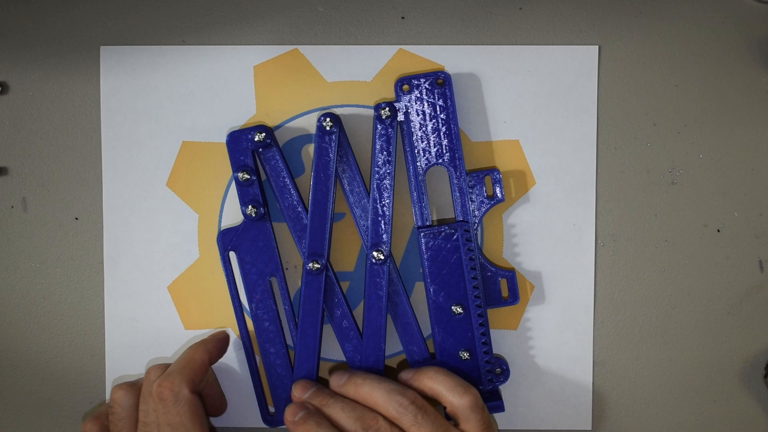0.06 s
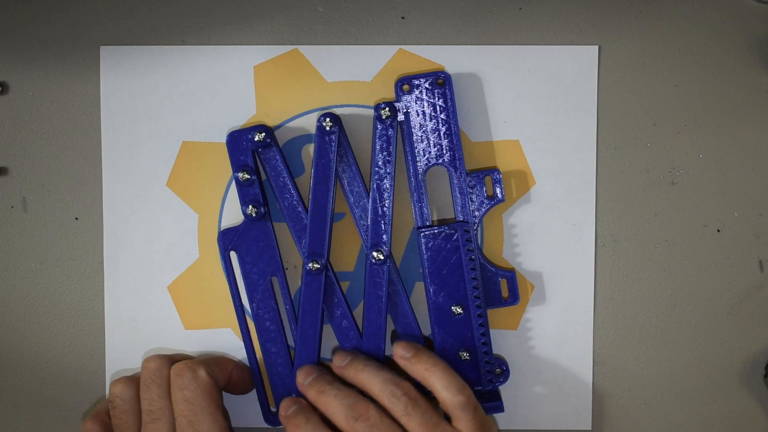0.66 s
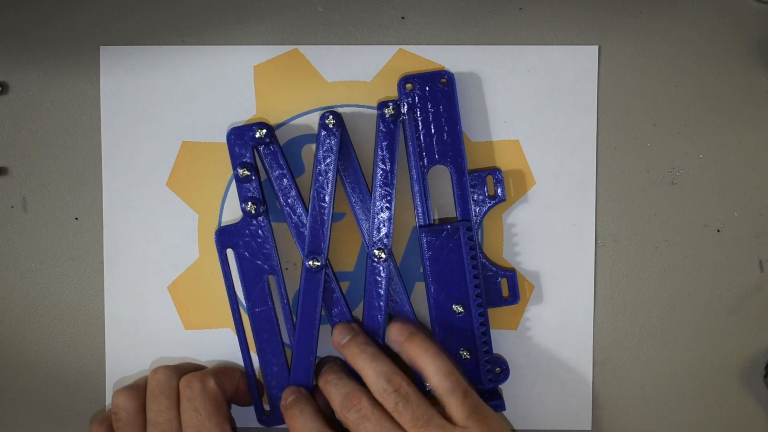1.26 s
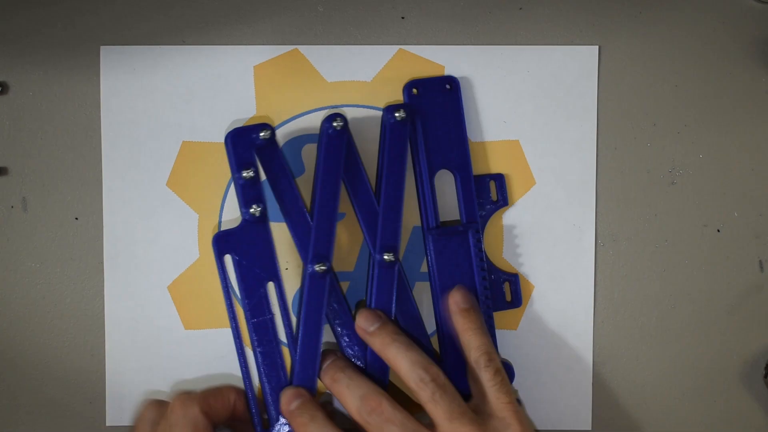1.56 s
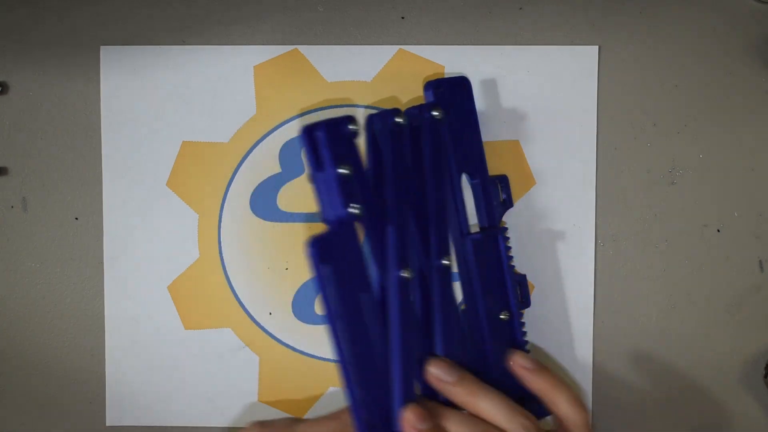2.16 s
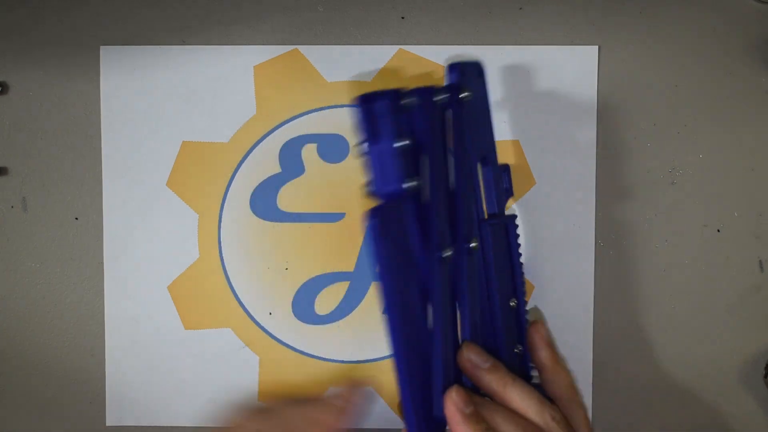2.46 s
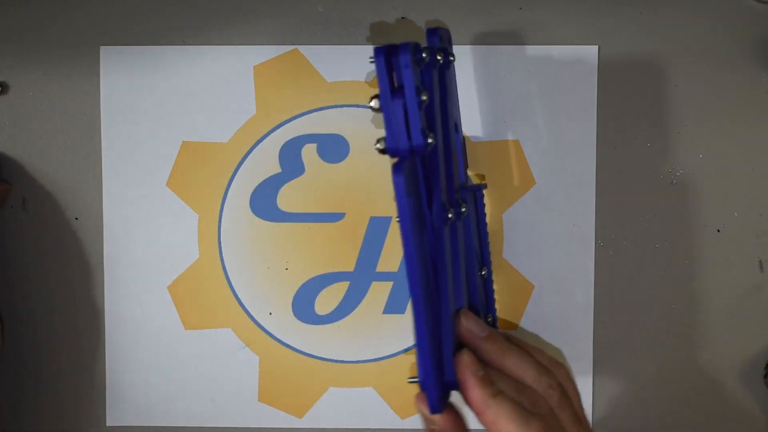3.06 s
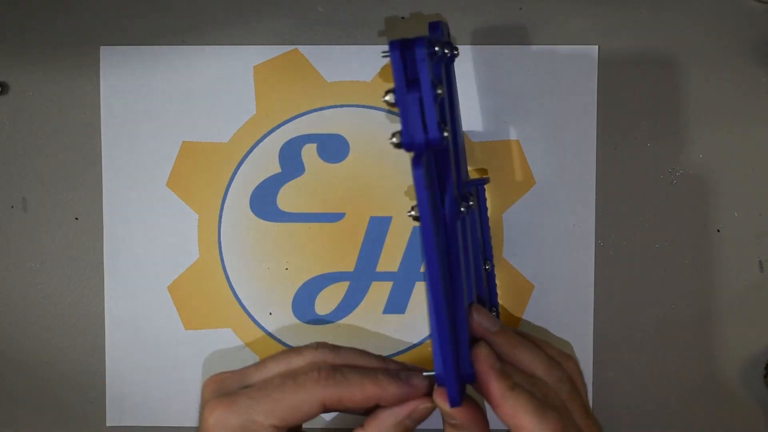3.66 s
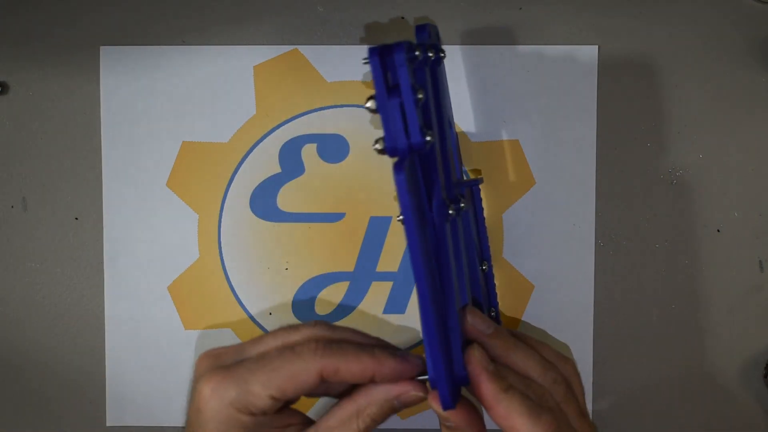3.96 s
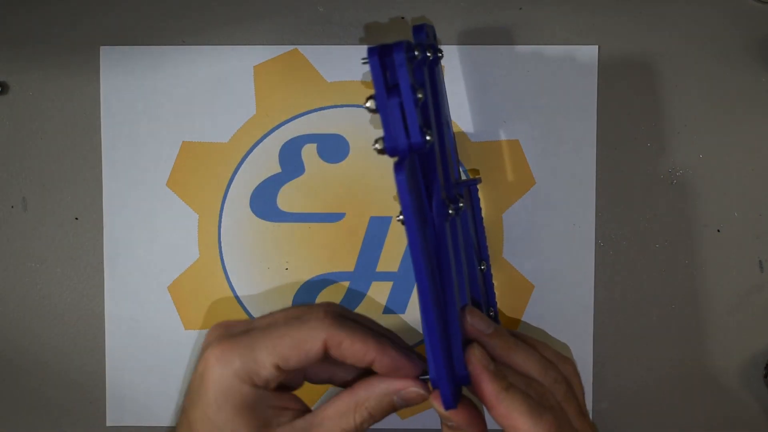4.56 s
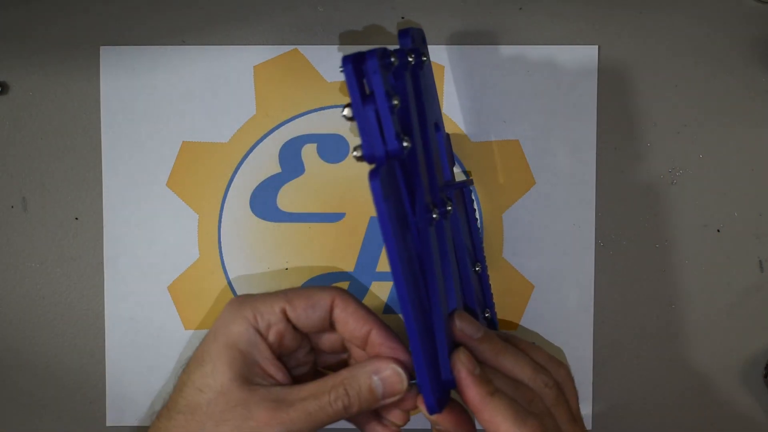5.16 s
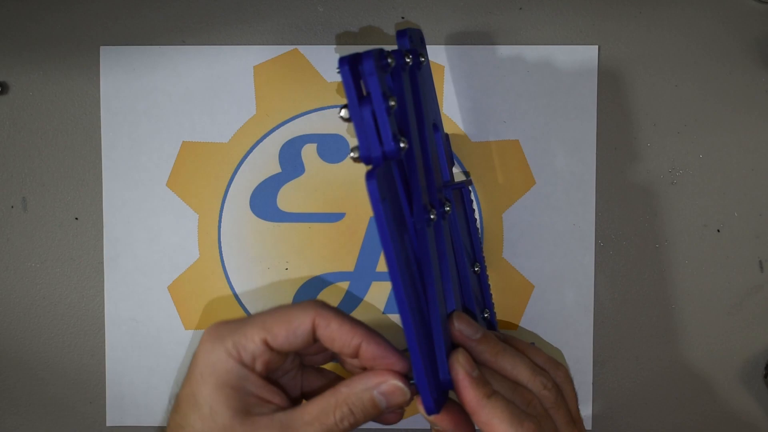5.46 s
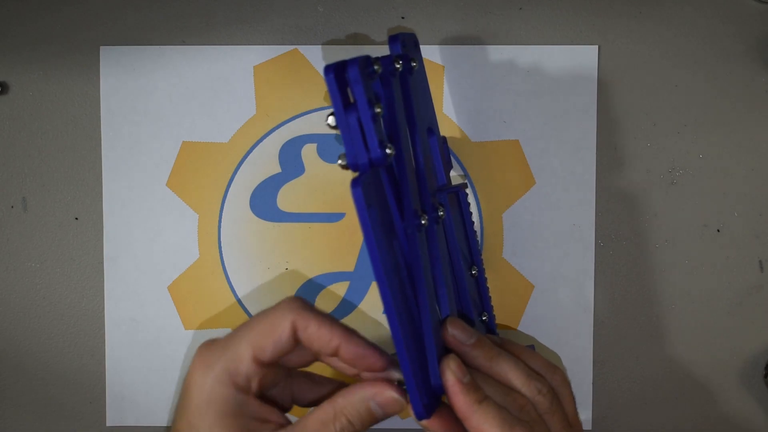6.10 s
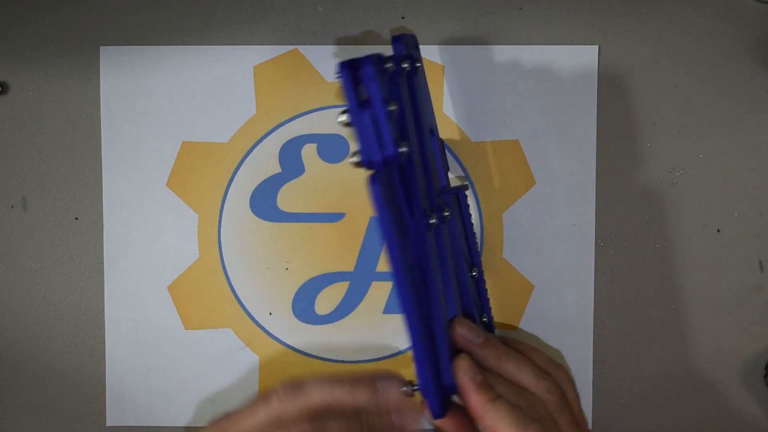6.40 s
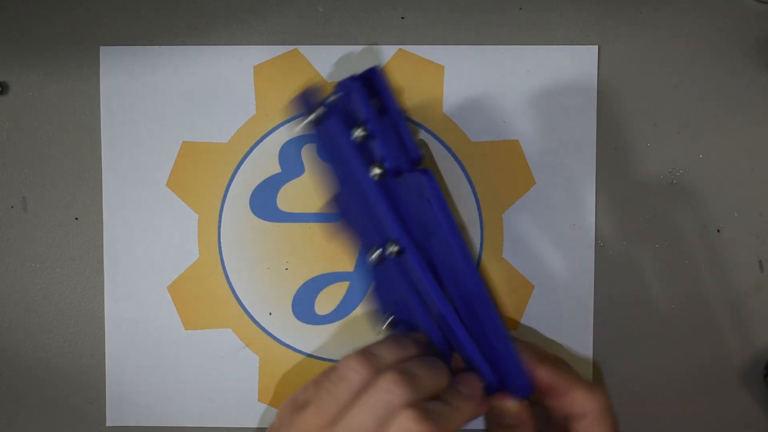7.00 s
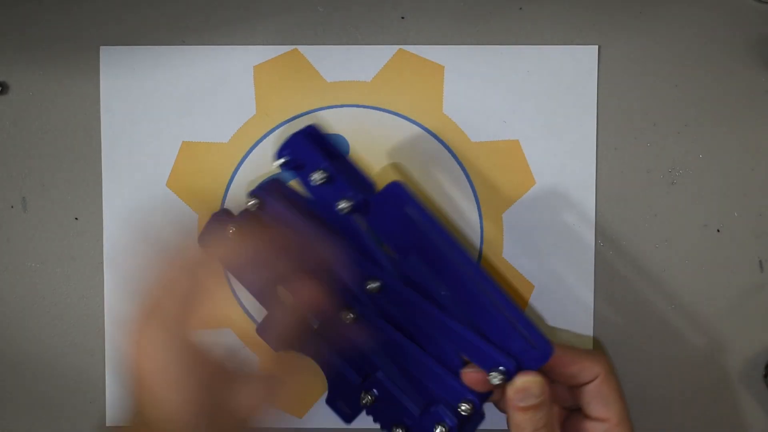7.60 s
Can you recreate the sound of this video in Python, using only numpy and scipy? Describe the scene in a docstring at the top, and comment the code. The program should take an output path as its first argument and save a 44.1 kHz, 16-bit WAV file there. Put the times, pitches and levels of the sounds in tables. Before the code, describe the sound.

A frame of hard plastic links is handled on a desk, close and central in a small quiet room. It starts with light clicks, soft knocks and a tiny creak from the catch. At about 0.9 seconds a slider rasps briefly and hits its stop with a sharp, loud clack. Around 1.6 seconds comes a cluster of strong knocks that ring the desk top. Lighter knocks, clicks and short scrapes continue until about 3 seconds. From there to 6.5 seconds it is much quieter, with only scattered ticks and soft finger nudges. Around 7 seconds the frame is dragged over the desk, rubbing with a brief squeal, and a few knocks follow between 7.4 and 7.8 seconds. Soft room air and the faint high whine of a fan lie behind it all.

```python
"""Folding frame on a desk

Close microphone, small quiet room: a frame of hard plastic links is handled on a desk, dead centre.
Its catch creaks and lets go, a slider rasps to its stop; the frame is folded, stood up, fiddled with
and dragged round, rubbing and squealing. Links click as their edges snap past each other, and knocks
ring the desk top. Behind it all, in stereo, lie room air and the faint whine of a fan."""
import sys
import numpy as np
from scipy import signal
from scipy.fft import rfft, irfft, next_fast_len
from scipy.io import wavfile
from scipy.ndimage import uniform_filter1d, map_coordinates

SR = 44100
rng = np.random.default_rng(int(sys.argv[2]) if len(sys.argv) > 2 else 0)


def log_audio(samples):
    """Write samples as a 16-bit WAV file to the path given in sys.argv[1]."""
    # one column per channel
    frames = np.atleast_2d(samples).T
    # limit to full scale, then quantise
    limited = np.clip(frames, -1, 1)
    pcm = np.round(limited * 32767).astype(np.int16)
    wavfile.write(sys.argv[1], SR, pcm)


N = 345744
TIME = np.arange(N) / SR
AGE = TIME[:SR // 2]  # time since a blow [s]

# Event levels are relative within each table.
# the frame knocks on the desk: (time [s], level [dB], pitch [Hz], clack re knock [dB])
KNOCKS = [(0.011, -54.5, 317, -0.5), (0.115, -47.5, 125, -15), (0.403, -47.5, 330, -8.5),
          (0.758, -47.5, 347, -17), (0.802, -47.5, 302, 2.5), (1.158, -44.5, 603, -10),
          (1.394, -47, 365, -11), (1.534, -46.5, 257, -12), (1.564, -37.5, 295, -16),
          (1.58, -20.5, 386, -14), (1.582, -29, 750, -24), (1.584, -33, 1120, -33), (1.63, -31.5, 376, -15),
          (1.637, -31, 412, -16), (1.741, -29.5, 205, -19.5), (2.068, -41, 194, -9),
          (2.261, -45.5, 177, -13), (2.283, -48.5, 367, -4), (2.529, -42, 171, -4.5),
          (2.595, -46.5, 165, -14), (2.851, -38.5, 243, -4.5), (3.029, -47, 155, -24),
          (3.054, -53, 760, 8.5), (3.549, -52, 420, -2.5), (3.6, -49, 204, -13), (4.019, -55, 180, -1.5),
          (5.897, -54.5, 163, -5), (6.702, -43.5, 305, -10), (7.42, -38, 238, -6), (7.44, -39.5, 348, -13),
          (7.676, -42.5, 138, -7), (7.734, -43.5, 268, 2), (7.762, -44, 131, -25)]
# links and screws click: (time [s], level [dB], body [dB], pitch [Hz])
CLICKS = [(0.012, -48, 10, 1870), (0.077, -49.5, 1, 2900), (0.103, -42.5, -4, 2980), (0.118, -45, -7, 3440),
          (0.183, -48, 4, 3550), (0.209, -53, 4, 5350), (0.768, -49.5, 0, 4900), (0.797, -41.5, 9, 1650),
          (0.8, -36, -1, 1640), (0.817, -46, 4, 3400), (0.8512, -30, -10, 4960), (0.856, -26, -14, 4330),
          (0.871, -30, -9, 3500), (1.14, -50, 7, 3350), (1.163, -48, 0, 3630), (1.475, -45, -4, 2860),
          (1.61, -46.5, -4, 4200), (1.638, -46.5, -5, 4500), (1.694, -45, 5.5, 2000),
          (1.748, -46.5, 4, 5300), (1.843, -52.5, 2, 1780), (2.156, -53.5, -5, 7800),
          (2.285, -45.5, 8, 2270), (2.538, -43, 13, 1950), (2.546, -42, 1, 4940), (3.549, -46, -7, 5000),
          (3.559, -51, -9, 4940), (4.0185, -41.5, -23, 4800), (5.899, -46.5, -17, 3600),
          (6.451, -51.5, -7, 4700), (6.489, -51, -16, 4800), (7.564, -50, -1, 5070)]
# the slider hits its stop: (time [s], level [dB])
STOP_HITS = [(0.892, -17), (0.897, -26)]
# the thumb presses the catch: (start [s], length [s], level [dB])
PRESSES = [(0.1, 0.023, -55), (0.191, 0.051, -61.5), (0.257, 0.032, -45.5)]
# the frame is pushed over the desk: (start [s], length [s], level [dB], tilt [dB/octave])
STROKES = [(0.451, 0.042, -69.5, -0.5), (1.556, 0.11, -69.5, 2), (2.016, 0.17, -71.5, -1.5),
           (2.456, 0.09, -75, 4), (2.713, 0.058, -62.5, -0.5), (2.804, 0.046, -55.5, -0.4),
           (2.878, 0.13, -65, -2.5), (3.146, 0.035, -63.5, -2.3), (3.221, 0.03, -73, -2.5),
           (6.655, 0.087, -71.5, -3.1), (6.836, 0.016, -63, 1), (6.866, 0.044, -46, -1),
           (6.964, 0.11, -43.5, 0.1), (7.108, 0.041, -43, 0), (7.188, 0.014, -49, 0.1),
           (7.225, 0.026, -67.5, -4), (7.672, 0.13, -68, -2)]
# friction squeals: (start [s], length [s], first pitch [Hz], last pitch [Hz], level [dB])
SQUEALS = [(2.13, 0.14, 8450, 8400, -82), (2.47, 0.05, 7500, 7400, -73.5), (6.886, 0.0078, 360, 362, -33),
           (6.962, 0.079, 363, 319.6, -40.5), (6.999, 0.011, 333.4, 324, -37),
           (6.968, 0.056, 1930, 1940, -41), (6.998, 0.16, 1105, 1472, -48), (7.052, 0.12, 1915, 1920, -49)]
# fingers nudge the frame: (time [s], level [dB])
NUDGES = [(0.631, -61.5), (1.34, -65.5), (3.70, -70.5), (3.91, -66.5), (4.30, -67), (4.648, -62.5),
          (5.654, -61), (6.311, -58), (6.397, -55.5), (6.478, -61.5)]
# a finger brushes along a link: (start [s], length [s], level [dB])
BRUSHES = [(1.394, 0.06, -72.5), (3.308, 0.022, -67), (6.704, 0.0087, -66), (7.754, 0.095, -71.5)]

# modes of the frame lying on the desk, and of the stop: (frequency [Hz], level [dB], t60 [s])
DESK_MODES = [(87, -15.5, 0.3), (164.4, -7.5, 0.15), (204.7, -9.5, 0.14), (361, -6, 0.12), (406, -14, 0.16),
              (568, -13.5, 0.099), (711, -11.5, 0.035)]
STOP_MODES = [(50.2, -28, 1), (100, -30, 0.79), (390, -14, 0.09), (577.6, -10.5, 0.19), (740, -15, 0.096),
              (1185, -6, 0.084), (1348, -10.5, 0.12), (1563, -9, 0.082), (1634, -12, 0.057),
              (2400, -17, 0.036), (2560, -11, 0.045)]
# modes of a plastic link: (frequency [Hz], level [dB])
LINK_MODES = [(1020, -17), (1150, -0.5), (1330, -1), (1640, -2), (1925, 1.5), (2250, -2.5), (2450, -20.5)]
# resonances of the dragged frame, the slider and the catch: (frequency [Hz], width [Hz], level [dB])
FRAME_PEAKS = [(164.5, 63, -0.5), (366, 93, -2), (573, 66, -6.5), (748, 43, -7.5), (1232, 58, -11.5),
               (1910, 360, -13), (2220, 180, -15), (2460, 85, -13.5), (3370, 47, -15), (4960, 150, -22),
               (8200, 380, -21.5), (8900, 270, -21.5), (11700, 270, -27.5)]
SLIDER_PEAKS = [(366, 99, -1.5), (1660, 160, -4.5), (2720, 370, -5.5), (3600, 420, -1.5), (4810, 420, -6),
                (6120, 230, -10.5), (8750, 1200, -16.5), (12200, 640, -17), (13500, 610, -22)]
CATCH_PEAKS = [(335, 100, 8.5), (1970, 220, -3), (2900, 290, -2.5), (3590, 520, -0.5), (4400, 91, -2),
               (5700, 490, -9.5), (7750, 590, -19)]
# spectra of friction at the frame, slider, catch and skin: (frequency [Hz], level [dB])
RUB_COLOUR = [(40, -40), (75, -51), (110, -2.5), (250, -8.5), (450, -15), (900, -15.5), (1700, -18.5),
              (2600, -20), (4200, -23.5), (7400, -30.5), (10200, -34.5), (15500, -39)]
RASP_COLOUR = [(60, -35), (130, -6), (400, -9.5), (1100, -7), (2400, -12), (4500, -17), (7000, -13.5),
               (10500, -18), (13500, -27), (15500, -29)]
CREAK_COLOUR = [(60, -27), (110, 0), (300, -3), (700, -6.5), (1800, -2.5), (4000, -28), (8500, -27),
                (10000, -30), (15500, -38)]
SKIN_COLOUR = [(300, -20), (1500, 2), (3000, -1), (5000, -3), (8500, -1), (11000, -7), (15500, -9)]
# spectra of broad blows, small contacts and the booming desk top: (frequency [Hz], level [dB])
CLACK_COLOUR = [(100, -64), (300, -4), (800, 1.5), (1300, -7.5), (2300, -3.5), (3200, -15.5), (6000, -26.5),
                (15000, -37)]
TICK_COLOUR = [(300, -4), (1000, 2.5), (2000, 4.5), (2900, 6), (3800, 1.5), (4900, -1.5), (6400, -4.5),
               (8400, -0.5), (10500, -11), (13000, 1.5), (15500, -9)]
BOOM_COLOUR = [(20, -17), (34, -16), (49, -8.5), (66, -22), (98, -10.5), (135, -9.5), (220, -55),
               (600, -95)]

# decay of the small room: (frequency [Hz], t60 [s])
ROOM_DECAY = [(100, 0.44), (400, 0.39), (2000, 0.39), (7000, 0.34), (14000, 0.26)]
# the fan's noise bands: (frequency [Hz], width [Hz], level [dB])
FAN_BANDS = [(191.8, 13, -80), (954.6, 19, -84), (1006, 430, -82.5)]
# spectrum of room air and microphone hiss: (frequency [Hz], level [dB])
AIR_COLOUR = [(20, -7), (32, -8), (50, -1.5), (65, -8.5), (100, -8), (190, -5), (250, -12), (360, -8.5),
              (550, -12.5), (800, -12.5), (1050, -14), (1400, -16.5), (2600, -23.5), (15500, -27.5)]
# how alike that air is left and right: (frequency [Hz], correlation [0-1])
AIR_LIKENESS = [(60, 0.97), (180, 0.99), (550, 0.97), (1650, 0.98), (4970, 0.47), (15000, 0.4)]


def knocks():
    """The frame lands with a thump that rings desk and links, then rocks back, softer and lower."""
    out = np.zeros(N)
    rebounds = [(s + 0.014, db - 8, hz * 0.634, clack_db) for s, db, hz, clack_db in KNOCKS]
    link_modes = [(hz, db, 0.035) for hz, db in LINK_MODES]  # hard plastic damps them all quickly
    for s, db, hz, clack_db in list(KNOCKS) + rebounds:
        swing = np.sin(2 * np.pi * hz * AGE) * amp(-60 * AGE / 0.031) * (1 - np.exp(-AGE / 0.0021))
        thump = np.gradient(swing) * SR / (2 * np.pi * hz)  # the air follows the surface's speed
        hardness_db = 0.19 * (db + 35.5)  # per octave: a hard blow is brief and reaches higher modes
        modes = [(f, level + hardness_db * np.log2(f / 400), t60) for f, level, t60 in DESK_MODES]
        desk = amp(-7.5) * ring(modes, scatter_db=2.5)
        links = amp(-11.5) * ring(link_modes, scatter_db=2.5)
        clack = amp(-3.5) * crack(colour(CLACK_COLOUR), 0.0023, t60=0.029, rattle=(-15, 0.26))
        add(out, s, amp(db) * (amp(5) * thump + desk + amp(clack_db) * (links + clack)))
    return out


def clicks():
    """Hard edges scuff, then snap past each other; small contacts are brighter and quicker."""
    out = np.zeros(N)
    ping_db, ping_width = 8, 0.13  # the struck part's resonance; width as a share of its pitch
    for s, db, body_db, hz in CLICKS:
        edge_db = -10 - 0.66 * body_db  # the less body, the keener the edge
        screw_db = 0.67 * max(-body_db - 6, 0)  # with little body, a screw's own ping stands out
        tilt = [(2300, body_db), (4600, 0), (6500, 0.022), (8400, screw_db), (11000, edge_db)]
        ping = lambda f: ping_db * band(f, hz, ping_width * hz)
        response = lambda f: amp(along(TICK_COLOUR, f) + along(tilt, f) + ping(f))
        tick = crack(response, 0.00011 * amp(-edge_db), t60=0.015, rattle=(-16.5, 0.12))
        scuff = crack(response, 0.0024, t60=0.011, rattle=(-19, 0.054))
        add(out, s, amp(db - 3) * tick)
        add(out, s - 0.005, amp(db - 15 + min(body_db, 0)) * scuff)
    return out


def slider(start_s=0.852, end_s=0.894, rasp_db=-35):
    """The slider rasps along its ridged track and slams into the stop, which shakes the desk."""
    grain = slips(rate=9000, spread_db=2) * amp(2.2 * wobble(300))
    rasp = unit(filtered(grain, resonant(RASP_COLOUR, SLIDER_PEAKS, peak_db=3)))
    launch = np.clip((TIME - start_s) / 0.019, 0, 1)
    halt = amp(-60 * np.maximum(TIME - end_s, 0) / 0.0051)
    out = amp(rasp_db) * launch * halt * rasp
    for s, db in STOP_HITS:
        slam = amp(-7) * crack(colour(CLACK_COLOUR), 0.00027, t60=0.017, rattle=(-18, 0.18))
        add(out, s, amp(db) * (slam + amp(-13) * ring(STOP_MODES, scatter_db=3.5)))
    return out


def catch():
    """Under the thumb the catch sticks and slips in uneven jerks, and its edge snags with tiny ticks."""
    pressure = sum(amp(db) * swell(s, length, rise_s=0.017, fall_s=0.04) for s, length, db in PRESSES)
    jerk_hz = 140 * amp(2.25 * wobble(59.5))
    grain = slips(rate=6800, spread_db=4.5) * amp(2.4 * np.cos(phase(jerk_hz)))
    creak = unit(filtered(grain, resonant(CREAK_COLOUR, CATCH_PEAKS, peak_db=2)))
    thin = [(2300, -12), (4600, 2), (8400, 3.5), (11000, -12.5)]
    tick = crack(colour(TICK_COLOUR, thin), 0.00049, t60=0.016, rattle=(-27, 0.044))
    snags = unit(signal.fftconvolve(slips(rate=400, spread_db=6), tick)[:N])
    return pressure * (amp(-0.5) * creak + amp(-7) * snags)


def drags(pivot_hz=1600):
    """Screw heads and edges rub over the desk: the frame shudders, the links rub, the grit hisses."""
    grain = slips(rate=8000, spread_db=2.5) * amp(1.8 * wobble(110))
    grain = moving_contact(grain, depth_db=3)
    friction = unit(filtered(grain, resonant(RUB_COLOUR, FRAME_PEAKS, peak_db=0.5)))
    octaves = lambda hz: np.log2(np.clip(hz, 150, 9000) / pivot_hz)
    out = np.zeros(N)
    for s, length, db, tilt_db in STROKES:
        push = amp(db) * swell(s, length, rise_s=0.042, fall_s=0.055)
        near = np.abs(TIME - s) < 0.5
        out[near] += filtered((push * friction)[near], lambda hz: amp(tilt_db * octaves(hz)))
    return out * amp(4 + 0.77 * wobble(28))  # the hand does not push evenly


def moving_contact(x, depth_db):
    """As the point of contact moves, different bands of the upper modes come forward."""
    hz, _, spectrum = signal.stft(x, SR, nperseg=512)
    patches = uniform_filter1d(rng.standard_normal(spectrum.shape), size=4, axis=0)
    patches = unit(uniform_filter1d(patches, size=12, axis=1))
    upper = np.clip(hz / 1500, 0, 1)[:, None]
    return signal.istft(spectrum * amp(depth_db * upper * patches), SR, nperseg=512)[1][:N]


def squeals():
    """Friction makes single resonances sing and glide as the frame turns."""
    out = np.zeros(N)
    for s, length, start_hz, end_hz, db in SQUEALS:
        glide = phase(np.interp(TIME, [s, s + length], [start_hz, end_hz]))
        width_hz = 32 + 0.055 * start_hz
        flutter = unit(filtered(rng.standard_normal((2, N)), lambda hz: band(hz, 0, width_hz)))
        purity = 750 / start_hz  # low squeals are mostly tone, high ones mostly noise
        tone = unit((flutter[0] + purity) * np.cos(glide) + flutter[1] * np.sin(glide))
        out += amp(db) * swell(s, length, rise_s=0.016, fall_s=0.028) * tone
    return out


def nudges():
    """A fingertip rocks the frame softly: a brief swell of its low resonances."""
    touch = sum(amp(db) * np.exp(-np.abs(TIME - s) / 0.018) for s, db in NUDGES)
    soft = colour([(100, -4.5), (230, -3.5), (360, 2.5), (550, -5.5), (2000, -5.5), (9000, -9)])
    frame = resonant(RUB_COLOUR, FRAME_PEAKS, peak_db=3)
    body = filtered(slips(rate=3400, spread_db=3.5), lambda hz: frame(hz) * soft(hz))
    return amp(1.5) * touch * unit(body)


def brushes():
    """Skin slides over smooth plastic with a soft hiss."""
    touch = sum(amp(db) * swell(s, length, rise_s=0.029, fall_s=0.051) for s, length, db in BRUSHES)
    return touch * noise(colour(SKIN_COLOUR))


def desk_boom(handling, lag_s=0.064, loud_db=-35.5):
    """The desk top booms faintly, the more so the harder the frame is handled."""
    keep = np.exp(-1 / (lag_s * SR))
    effort = signal.lfilter([1 - keep], [1, -keep], np.abs(handling)) / amp(loud_db)
    return amp(-58.5) * effort ** 0.47 * noise(colour(BOOM_COLOUR))


def room(x, sway_hz=4):
    """The moving frame excites the room from changing places: the sound sways between two echoes."""
    place = 2 * np.pi * sway_hz * TIME
    shares = np.cos(place), np.sin(place)
    return sum(signal.fftconvolve(x * share, reflections())[:N] for share in shares)


def reflections():
    """Near walls answer within milliseconds; each frequency dies at its own speed."""
    hz, t, spectrum = signal.stft(rng.standard_normal(SR), SR, nperseg=256)
    decay = amp(-60 * t / along(ROOM_DECAY, hz)[:, None])
    tail = signal.istft(spectrum * decay, SR, nperseg=256)[1]
    tail *= 1 - np.exp(-TIME[:len(tail)] / 0.0016)
    return tail / np.linalg.norm(tail)


def fan(whine_hz=960.4):
    """A fan in the background: bands of noise and a faint, slightly wandering whine."""
    blades = sum(amp(db) * noise(lambda f: band(f, hz, width)) for hz, width, db in FAN_BANDS)
    whine = unit(np.sin(phase(whine_hz + 4 * wobble(25))))
    return blades + amp(-78.5) * whine


def room_tone():
    """Room air and microphone hiss, nearly mono in the lows and wider in the treble."""
    spread = lambda hz: np.arccos(along(AIR_LIKENESS, hz)) / 2
    response = lambda hz: amp(along(AIR_COLOUR, hz)) * [np.cos(spread(hz)), np.sin(spread(hz))]
    mid, side = filtered(rng.standard_normal((2, N)), response)
    return amp(-69.5) * unit(np.array([mid + side, mid - side]))


def ring(modes, scatter_db):
    """Struck modes, at new strengths for every blow."""
    out = np.zeros(len(AGE))
    for hz, db, t60 in modes:
        decay = amp(db + scatter_db * rng.standard_normal() - 60 * AGE / t60)
        out += decay * rng.choice([-1, 1]) * np.sin(2 * np.pi * hz * AGE)
    return out


def crack(response, rise_s, t60, rattle):
    """A contact's dense upper modes: a burst, then the joints' weaker rattle (level [dB], t60 [s])."""
    rattle_db, rattle_t60 = rattle
    decay = amp(-60 * AGE / t60) + amp(rattle_db - 60 * AGE / rattle_t60)
    return noise(response, len(AGE)) * (1 - np.exp(-AGE / rise_s)) * decay


def slips(rate, spread_db):
    """Tiny random slips of one rough face over another, rate a second."""
    impulses = (rng.random(N) < rate / SR) * rng.choice([-1, 1], N)
    return impulses * amp(spread_db * rng.standard_normal(N))


def swell(start, length, rise_s, fall_s):
    """Gain of one push of the hand: rise, hold, fall; the slopes are in seconds per 20 dB."""
    outside = np.maximum((start - TIME) / rise_s, (TIME - start - length) / fall_s)
    return amp(-20 * np.clip(outside, 0, 10))


def resonant(broad, peaks, peak_db):
    """Response of a part: resonances standing on a broad colour."""
    def response(f):
        peak_power = sum((amp(db + peak_db) * band(f, hz, width)) ** 2 for hz, width, db in peaks)
        return np.sqrt(amp(along(broad, f)) ** 2 + peak_power)
    return response


def colour(*curves):
    """Response of (frequency [Hz], level [dB]) curves in series."""
    return lambda hz: amp(sum(along(curve, hz) for curve in curves))


def band(hz, centre, width):
    """A resonance peak of height 1, falling to half at the edges of its width."""
    return 1 / (1 + (2 * (hz - centre) / width) ** 2)


def noise(response, n=N):
    """Coloured noise at rms 1."""
    return unit(filtered(rng.standard_normal(n), response))


def filtered(x, response):
    """Shape x by a gain that depends on frequency."""
    n = x.shape[-1]
    padded = next_fast_len(n + 8192)
    return irfft(rfft(x, padded) * response(np.fft.rfftfreq(padded, 1 / SR)), padded)[..., :n]


def wobble(rate):
    """A smooth random curve, rate knots a second."""
    return map_coordinates(rng.standard_normal(int(N * rate / SR) + 4), [TIME * rate], order=1)


def phase(hz):
    """Running phase of a changing pitch."""
    return 2 * np.pi * np.cumsum(hz) / SR


def along(points, hz):
    """Read (frequency [Hz], value) points on a log axis."""
    knots, values = np.transpose(points)
    return np.interp(np.log(hz + 1), np.log(knots + 1), values)


def add(track, s, sound):
    """Mix a sound into the track at time s."""
    part = track[max(round(s * SR), 0):][:len(sound)]
    part += sound[:len(part)]


def amp(db):
    """Decibels to gain."""
    return 10 ** (np.asarray(db) / 20)


def unit(x):
    """Scale to rms 1."""
    return x / np.sqrt(np.mean(x ** 2) + 1e-20)


def scene():
    """The handling sits close and central, with a little room on it; air and fan lie behind."""
    handling = knocks() + clicks() + nudges() + catch() + slider() + drags() + squeals() + brushes()
    return handling + amp(-11) * room(handling) + desk_boom(handling) + room_tone() + fan()


def record(dry, top_hz=15800):
    """The microphone chain passes nothing above its band limit."""
    return filtered(dry, lambda hz: hz < top_hz)


dry = scene()
out = record(dry)
log_audio(out)
```